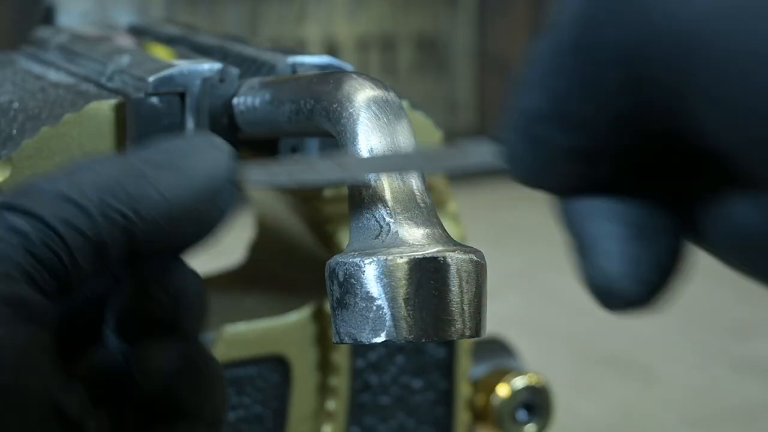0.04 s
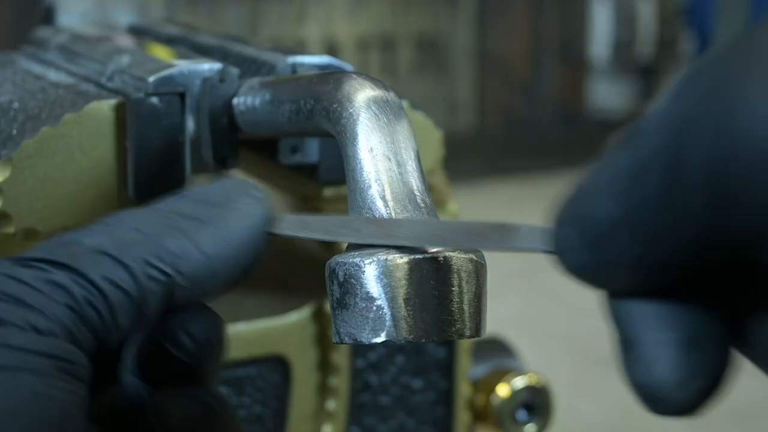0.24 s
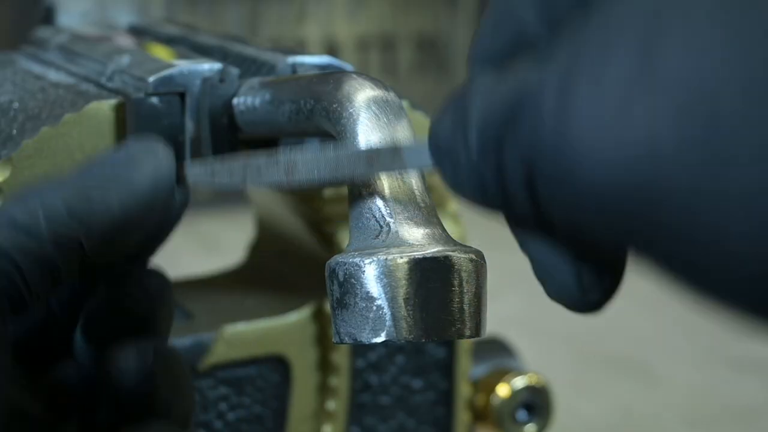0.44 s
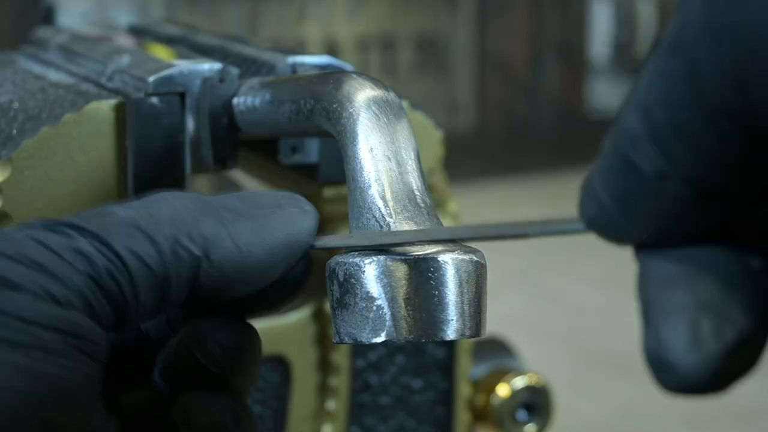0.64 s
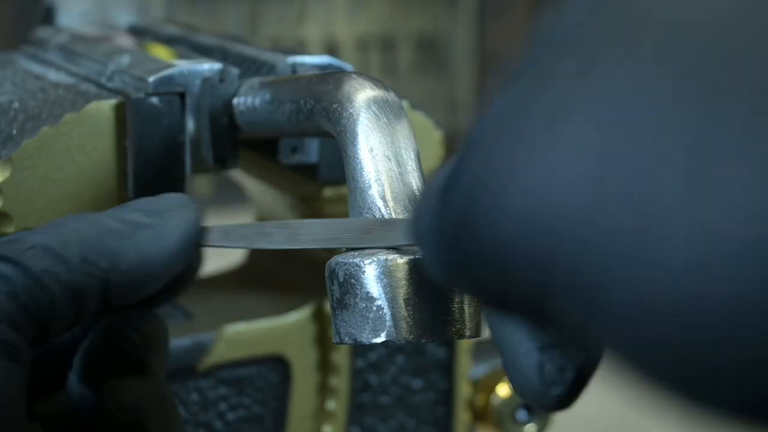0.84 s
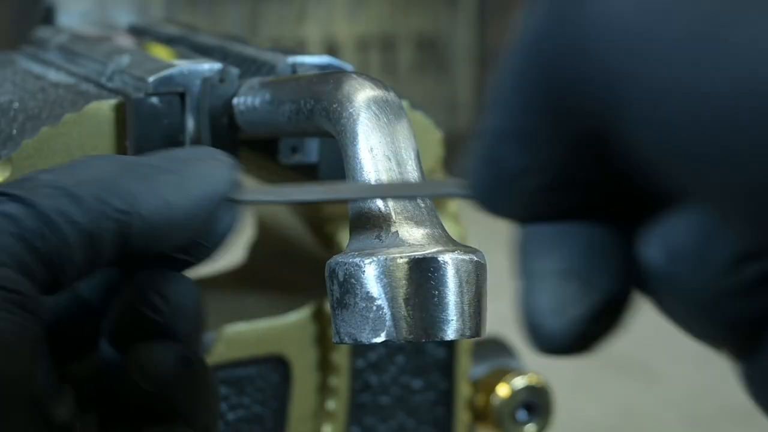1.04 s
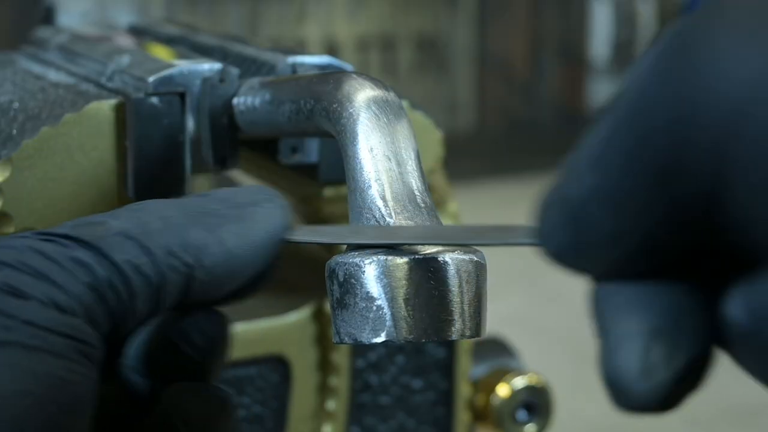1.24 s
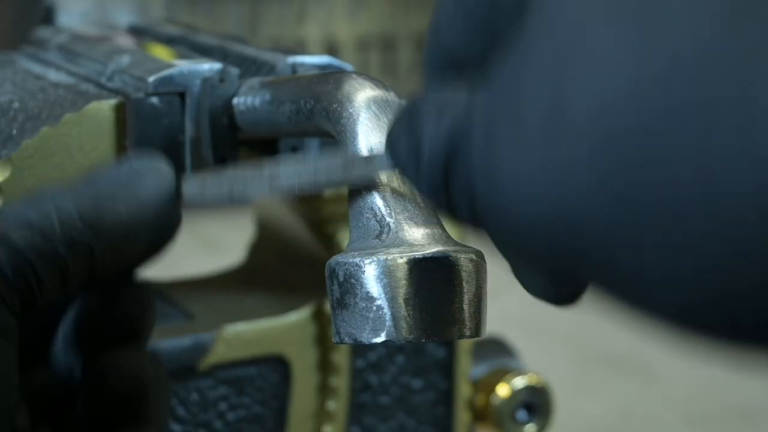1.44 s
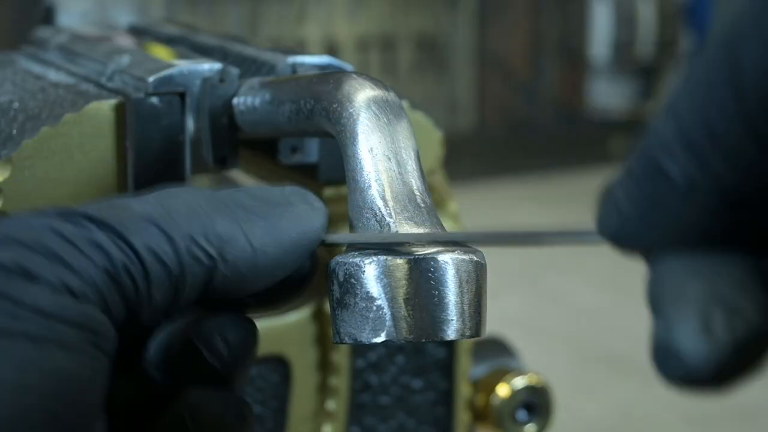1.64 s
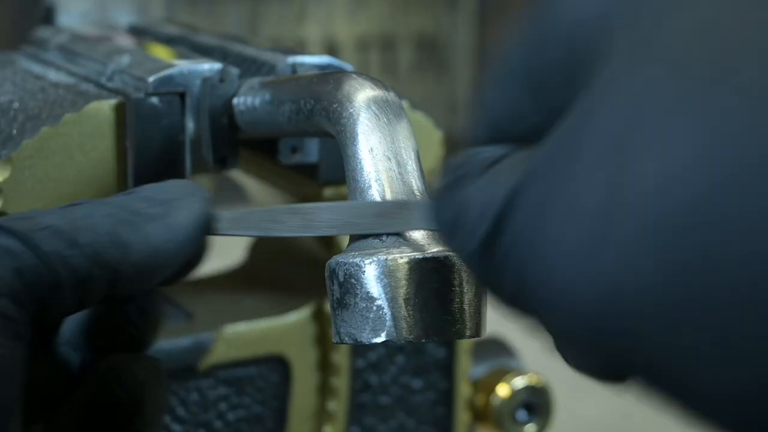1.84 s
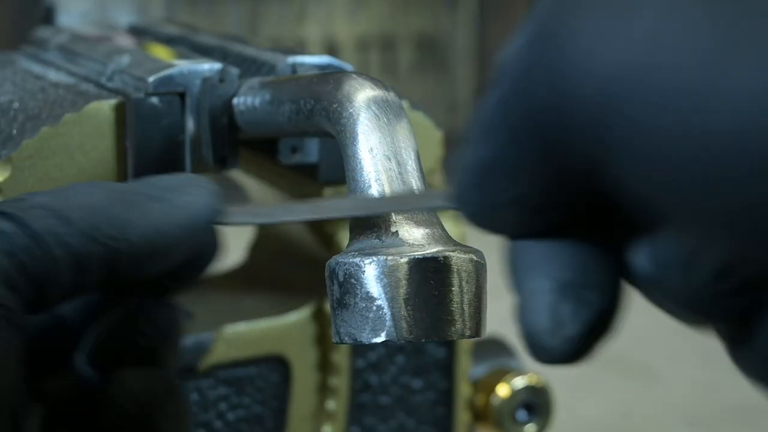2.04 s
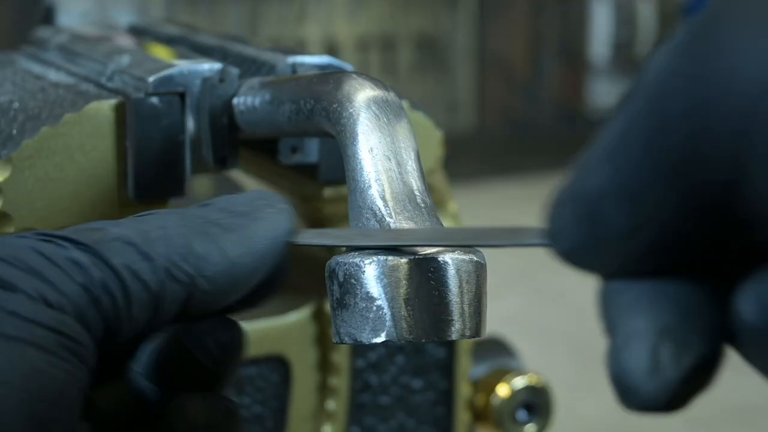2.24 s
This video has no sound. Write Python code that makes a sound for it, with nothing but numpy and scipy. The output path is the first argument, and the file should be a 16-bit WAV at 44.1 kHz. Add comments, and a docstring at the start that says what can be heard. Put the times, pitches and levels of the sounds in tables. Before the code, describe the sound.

A metal file rasps on clamped steel, close and fairly dry. The tail of one push opens; landings click and chatter near 0.23, 0.74, 1.22, 1.74 and 2.22 seconds. Gritty, ringing pushes follow the first four, around 0.3-0.45, 0.8-1.0, 1.35-1.5 and 1.8-2.0, with dull vise knocks near 0.3-0.4. A light return drag brushes around 0.6. Faint workshop hiss continues underneath.

```python
"""In a quiet, fairly dry workshop, a small hand file is pushed four times across a steel tool in a vise, close by.
A push already ending opens the scene, and a fifth landing closes it. Each landing is a click, chatter and ringing.
Irregular tooth impacts, filtered as noise, make the rasp; through damped modes they ring blade, vise and bench.
The file is lifted for the way back, but once drags lightly. Shaped noise gives the shop, its reverberation and
a faint unrelated hiss that differs between left and right."""
import sys
import numpy as np
from scipy import signal
from scipy.fft import rfft, irfft
from scipy.io import wavfile
from scipy.ndimage import uniform_filter1d

SR = 44100
rng = np.random.default_rng(int(sys.argv[2]) if len(sys.argv) > 2 else 0)


def wav_record(signal):
    """Record a signal, one row per channel, as 16-bit PCM in the file named by sys.argv[1]."""
    frames = np.transpose(np.atleast_2d(signal))
    bounded = np.clip(frames, -1, 1)
    # unit amplitude maps onto the largest positive 16-bit level
    quanta = np.round(bounded * 32767).astype(np.int16)
    wavfile.write(sys.argv[1], SR, quanta)


N = 101429
T = np.arange(N) / SR  # time in seconds

# Relative spectra, as breakpoints; only their shapes count: frequency_hz, density_db_per_hz
SHOP_SPECTRUM = [(15, -18), (25, -25), (107, -8.5), (173, -7.5), (567, -17), (1240, -25), (1410, -29),
                 (1570, -29.5), (2420, -26.5), (2630, -29), (3930, -27.5), (8810, -35), (15500, -33.5)]
SIDE_HISS_SPECTRUM = [(30, 9), (300, 4.5), (1500, 1.5), (15000, 6)]
DRAG_SPECTRUM = [(60, -34), (200, 13), (700, 5.5), (1900, 8), (3000, -0.5), (5000, -3.5), (7000, -10.5),
                 (9500, -8.5), (15000, -21)]
CLICK_SPECTRUM = [(100, -14), (900, -11.5), (1300, -7), (1750, 1), (2300, -2.5), (2900, -7.5), (3600, 0),
                  (5300, -1.5), (6300, 1.5), (7100, -3.5), (8700, 5.5), (11000, 2.5), (16000, 2.5)]
GRIND_SPECTRUM = [(60, -63.5), (200, -7.5), (250, -3.5), (295, -3), (340, 6), (385, -18), (440, 2.5),
                  (520, -10), (600, 0.5), (710, 2.5), (850, -9), (1050, -16), (1500, -25.5), (3000, -65)]
RASP_SPECTRUM = [(300, -31.5), (1150, 10), (1550, -3), (1830, 14.5), (1980, 16.5), (2100, 7), (2300, 6),
                 (2500, -0.5), (2950, 8), (3400, 3), (4000, -1), (4600, -3.5), (5000, -5), (5400, -0.5),
                 (6500, -7.5), (7100, -10), (7600, -2), (8400, -7), (8900, -2), (9600, -8.5), (12000, -13),
                 (14000, -19), (15200, -18), (16500, -18)]

# Damped modes of the bench: frequency_hz, relative_level_db, t60_s
BENCH_MODES = [(64, -11, 0.1), (89.3, -6, 0.16), (109, -0.5, 0.085), (128.3, 0, 0.1), (156, -10.5, 0.067),
               (195, -9.5, .25), (214.4, -14.5, 0.65)]
# Damped modes of the clamped tool and vise: frequency_hz, relative_level_db, t60_s
VISE_MODES = [(305, -5, .2), (323, 2, .28), (407, -4, .3), (495, -13, .15), (561, -1, .3), (662, -5, .12),
              (712, -1, .2), (739, -2, .25), (764, -1, .27), (820, -8, .25), (913, -18, .25),
              (962, -13, .15), (1155, -17, .12), (1360, -22, .25)]
# Damped modes of the thin blade: frequency_hz, relative_level_db, t60_s
BLADE_MODES = [(1927, 8.5, 0.058), (3203, 4.5, 0.043), (5200, 2, 0.039), (5600, -21, 0.068),
               (5920, -5, 0.024), (6340, 2.5, 0.082), (7260, -4, 0.022), (8300, -23, 0.044)]

# The blade brushes the steel on its way back: start_s, stop_s, level_db, tilt_db_per_octave
DRAG_EVENTS = [(0.572, 0.629, -64.5, 3.5), (0.685, 0.705, -62.5, -1)]
# Teeth snag in short crunches: start_s, initial_level_db, treble_edge_hz, tilt_db_per_octave, t60_s
SNAG_EVENTS = [(.137, -71.5, 5000, 0.5, 0.044), (.554, -61, 2200, -3, 0.047),
               (0.762, -52.5, 8000, -5, 0.0077), (.819, -51.5, 8000, 0.5, .12),
               (0.8389, -43.5, 6500, 4, 0.017), (.8430, -49.5, 6000, 7, 0.037),
               (0.852, -44, 7400, 0, 0.021), (2.1220, -61.5, 3020, 2, 0.01)]
# The blade grabs and jolts the vise: start_s, peak_db
JOLT_EVENTS = [(.006, -49.5), (.306, -39), (0.376, -34), (.513, -50)]
# The blade lands: start_s, click_db, treble_edge_hz, tilt_db_per_octave,
# chatter_db, chatter_t60_s, vise_peak_db, blade_peak_db
LANDING_EVENTS = [(0.2325, -44, 14000, 0, -48, 0.056, -54.5, -44),
                  (0.7375, -47.5, 7440, 4, -52.5, 0.11, -53, -51),
                  (1.2180, -51, 7540, -3, -56, 0.12, -51, -51),
                  (1.7386, -45.5, 12400, -.5, -46.5, .05, -53.5, -64),
                  (2.2237, -58.5, 4300, 3.5, -51, 0.13, -51.5, -82)]
# Forward strokes: full_speed_s, slowing_s, rasp_db (midway), vise_drive_db, bench_db,
# rasp_tilt_db_per_octave, rasp_fade_s, whistle_start_s
STROKE_EVENTS = [(-.12, -0.012, -83, -52, -59.5, 2, 0.27, -.1),
                 (0.333, 0.412, -60.5, -40.5, -53.5, 2.5, 0.46, .295),
                 (0.842, 0.918, -56.5, -40, -58, 2.5, 0.99, .89),
                 (1.37, 1.435, -58.5, -39, -55, 2.5, 1.503, 1.395),
                 (1.831, 1.964, -59, -45.5, -60.5, 2, 1.993, 1.90)]

SHOP_DB, SIDE_HISS_DB = -70, -13  # side hiss is relative to the mid noise level
ROOM_T60_S, ROOM_TREBLE_T60_S, ROOM_DB, ROOM_DELAY_S = 0.45, 0.35, -15.5, .006
ROOM_SPLIT_HZ = 2500
CLICK_RATTLE_T60_S, CLICK_RATTLE_DB = 0.0035, -14
KNOCK_EDGE_HZ = 333
CATCHES_PER_S, CATCH_SCATTER_DB = 4500, 3.5
JUDDER_PER_S, JUDDER_DB = 90, 1.5
GRAIN_BAND_HZ, GRAIN_PER_S, GRAIN_DB = 700, 64, 2
RASP_LEAD_S, RASP_RISE_DB_S, RASP_FALL_DB_S, RASP_SAG_DB_S = .018, 267, 392, 60.5
VISE_RISE_DB_S, VISE_FALL_DB_S = 277, 265
BENCH_LAG_S, BENCH_RISE_DB_S, BENCH_FALL_DB_S = 0.02, 396, 286
WHISTLE_HZ, WHISTLE_HZ_PER_S, WHISTLE_DB = 10360, 31000, -14.5  # level relative to the rasp envelope
GRIND_DB, RING_DB, BLADE_DB = -7, -4.5, -13  # gains applied to the driven bodies
TOP_HZ = 15700


def undb(db):
    """Level to amplitude: twenty decibels are a factor of ten."""
    return 10 ** (np.asarray(db) / 20)


def unit(x):
    """Normalisation of power: scale to rms 1."""
    return x / np.sqrt(np.mean(x ** 2))


def noise():
    """White noise: independent Gaussian samples have a flat spectrum."""
    return rng.standard_normal(N)


def fade(t60):
    """Exponential decay: the amplitude falls 60 dB in t60 seconds."""
    return np.exp(-np.log(1000) * T / max(t60, .001))


def swell(start, stop, rise_db_s, fall_db_s):
    """Exponential onset and release: rise, hold and fall, straight in dB."""
    before = np.maximum(start - T, 0)
    after = np.maximum(T - stop, 0)
    return undb(-rise_db_s * before - fall_db_s * after)


def at(s, x):
    """Pure delay: shift a sound to its moment."""
    return np.concatenate([np.zeros(int(s * SR)), x])[:N]


def through(x, response):
    """Linear filtering: convolve a sound with a response scaled to unit energy."""
    return signal.fftconvolve(x, response / np.sqrt(np.sum(response ** 2)))[:N]


def colour(points, tilt_db=0, edge_hz=None):
    """Minimum phase: the folded cepstrum of a spectrum yields its causal response."""
    f = np.maximum(np.fft.rfftfreq(4096, 1 / SR), 1)
    hz, db = np.array(points, float).T
    db = np.interp(np.log(f), np.log(hz), db)
    # the tilt pivots at 4 kHz and stays constant below 1 kHz
    db = db + tilt_db * np.log2(np.maximum(f, 1000) / 4000)
    if edge_hz:
        db = db - 10 * np.log10(1 + (f / edge_hz) ** 6)
    cepstrum = irfft(np.log(undb(db)))
    cepstrum[1:len(f) - 1] *= 2
    cepstrum[len(f):] = 0
    return irfft(np.exp(rfft(cepstrum)))


def ring(modes):
    """Modal superposition: a struck body answers with damped sinusoids, here of alternating sign."""
    response = 0
    for k, (hz, db, t60) in enumerate(modes):
        response = response + (-1) ** k * undb(db) * fade(t60) * np.sin(2 * np.pi * hz * T)
    return response


def steady_noise(level_db, spectrum):
    """Stationary noise: white noise filtered to a broad spectrum."""
    return undb(level_db) * through(noise(), colour(spectrum))


def room(x):
    """Diffuse reverberation: two bands of decaying noise, of which the treble dies first."""
    low_pass = signal.butter(2, ROOM_SPLIT_HZ, fs=SR, output="sos")
    high_pass = signal.butter(2, ROOM_SPLIT_HZ, "high", fs=SR, output="sos")
    low = signal.sosfilt(low_pass, noise()) * fade(ROOM_T60_S)
    high = signal.sosfilt(high_pass, noise()) * fade(ROOM_TREBLE_T60_S)
    tail = at(ROOM_DELAY_S, 2.5 * low + 0.42 * high)
    return undb(ROOM_DB) * through(x, tail)


def catches(per_s, scatter_db):
    """Random impact excitation: teeth bite and let go at irregular times, sizes and signs."""
    size = undb(scatter_db * np.minimum(rng.exponential(size=N), 4))
    happens = rng.random(N) < per_s / SR
    return unit(happens * size * np.sign(noise()))


def drags():
    """Light friction: unweighted brushing is a sparse, dry stream of contacts."""
    out = 0
    for start, stop, db, tilt_db in DRAG_EVENTS:
        brushing = catches(4000, 1.5) * undb(db) * swell(start, stop, 310, 390)
        out = out + through(brushing, colour(DRAG_SPECTRUM, tilt_db))
    return out


def crunch(db, t60, edge_hz, tilt_db):
    """Decaying impact train: a burst of tiny steel contacts, a little duller than a single click."""
    burst = catches(3500, 2.1) * undb(db) * fade(t60)
    return through(burst, colour(CLICK_SPECTRUM, tilt_db - 2.5, edge_hz))


def snags():
    """Catch and release: teeth catch and tear free in a crunch."""
    return sum(at(s, crunch(db, t60, edge_hz, tilt_db)) for s, db, edge_hz, tilt_db, t60 in SNAG_EVENTS)


def knock(vise):
    """Soft impact: a slow push wakes mostly the lowest modes of the vise; peak 1."""
    dull = signal.sosfilt(signal.butter(2, KNOCK_EDGE_HZ, fs=SR, output="sos"), vise)
    return dull / abs(dull).max()


def jolts(vise):
    """Impulsive loading: the vise knocks dully when the teeth dig in."""
    return sum(at(s, undb(db) * knock(vise)) for s, db in JOLT_EVENTS)


def tick(db, edge_hz, tilt_db):
    """Hard impact: steel on steel gives an impulse and a few milliseconds of rattle."""
    contact = (T == 0) + undb(CLICK_RATTLE_DB) * noise() * fade(CLICK_RATTLE_T60_S)
    # energy before colouring equals that of 15 ms at rms 1
    contact = contact * np.sqrt(.015 * SR / np.sum(contact ** 2))
    return undb(db) * through(contact, colour(CLICK_SPECTRUM, tilt_db, edge_hz))


def landings(vise, blade):
    """Impact and free vibration: click, chatter of settling teeth, vise and blade ringing, all starting together."""
    out = 0
    for s, db, edge_hz, tilt_db, chatter_db, chatter_t60, vise_db, blade_db in LANDING_EVENTS:
        click = tick(db, edge_hz, tilt_db)
        chatter = crunch(chatter_db, chatter_t60, edge_hz, tilt_db)
        vise_ring = undb(vise_db) * knock(vise)
        blade_ring = undb(blade_db) * blade / abs(blade).max()
        out = out + at(s, click + chatter + vise_ring + blade_ring)
    return out


def judder(per_s, db):
    """Stick-slip modulation: the gain flutters as the blade grips and slips."""
    knots = rng.standard_normal(N // 40)
    flutter = np.interp(T * per_s, np.arange(len(knots)), knots)
    return unit(undb(db * flutter))


def shimmer(x):
    """Moving contact: bands flare and fade independently as the contact wanders along the blade."""
    place = np.fft.rfftfreq(N, 1 / SR) / GRAIN_BAND_HZ
    place = np.minimum(place, 23)  # the last band takes all the treble above it
    spectrum = rfft(x)
    out = 0
    for k in range(24):
        weight = np.maximum(1 - abs(place - k), 0)  # overlapping triangles
        out = out + irfft(spectrum * weight, N) * judder(GRAIN_PER_S, GRAIN_DB)
    return out


def climbing_whistle(start):
    """Narrow-band sound: slow noise modulates the amplitude of a rising sinusoid."""
    hz = np.clip(WHISTLE_HZ + WHISTLE_HZ_PER_S * (T - start), SR / 8, SR / 3)
    waver = uniform_filter1d(uniform_filter1d(noise(), size=50), size=50)
    tone = unit(waver * np.sin(2 * np.pi * np.cumsum(hz) / SR))
    return tone * swell(start, start + 0.017, 200, 330)


def strokes(vise, blade):
    """Common excitation: the same tooth catches rasp and shake blade, vise and bench; a whistle climbs."""
    scrape, blade_drive, vise_drive, bench_drive = 0, 0, 0, 0
    for start, stop, rasp_db, vise_db, bench_db, tilt_db, lift, whistle_s in STROKE_EVENTS:
        teeth = catches(CATCHES_PER_S, CATCH_SCATTER_DB) * judder(JUDDER_PER_S, JUDDER_DB)
        # the rasp sags steadily about its level at the middle of the stroke
        from_middle = np.clip(T, start, lift) - (start + lift) / 2
        bite = undb(rasp_db - RASP_SAG_DB_S * from_middle)
        bite = bite * swell(start - RASP_LEAD_S, lift, RASP_RISE_DB_S, RASP_FALL_DB_S)
        rasp = through(teeth * bite, colour(RASP_SPECTRUM, tilt_db))
        scrape = scrape + rasp + undb(WHISTLE_DB) * bite * climbing_whistle(whistle_s)
        blade_drive = blade_drive + teeth * bite
        push = undb(vise_db) * swell(start, stop, VISE_RISE_DB_S, VISE_FALL_DB_S)
        vise_drive = vise_drive + teeth * push
        shove = undb(bench_db) * swell(start + BENCH_LAG_S, stop, BENCH_RISE_DB_S, BENCH_FALL_DB_S)
        bench_drive = bench_drive + teeth * shove
    blade_ring = undb(BLADE_DB) * through(blade_drive, blade)
    vise_ring = undb(RING_DB) * through(vise_drive, vise)
    grind = undb(GRIND_DB) * through(vise_drive, colour(GRIND_SPECTRUM))
    bench_ring = through(bench_drive, ring(BENCH_MODES))
    return shimmer(scrape + blade_ring) + vise_ring + grind + bench_ring


def scene():
    """Mid and side superposition: all lies dead centre but a faint unrelated hiss, opposite left and right."""
    vise, blade = ring(VISE_MODES), ring(BLADE_MODES)
    filing = drags() + snags() + jolts(vise) + landings(vise, blade) + strokes(vise, blade)
    mid = steady_noise(SHOP_DB, SHOP_SPECTRUM) + room(filing) + filing
    side_hiss = steady_noise(SHOP_DB + SIDE_HISS_DB, SIDE_HISS_SPECTRUM)
    return np.array([mid + side_hiss, mid - side_hiss])


def record(dry):
    """Band limitation: a steep elliptic low-pass, as the recorder cuts the top."""
    return signal.sosfilt(signal.ellip(8, .2, 70, TOP_HZ, fs=SR, output="sos"), dry)


dry = scene()
out = record(dry)
wav_record(out)
```